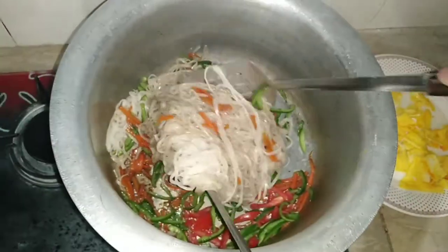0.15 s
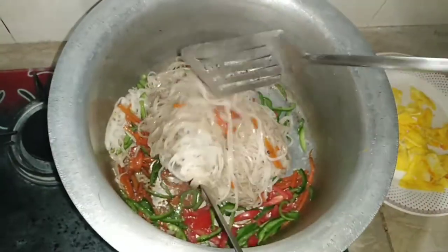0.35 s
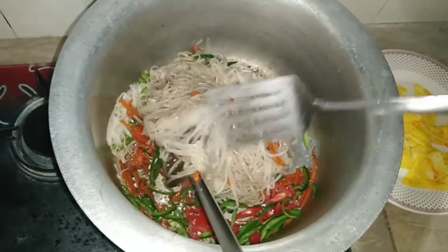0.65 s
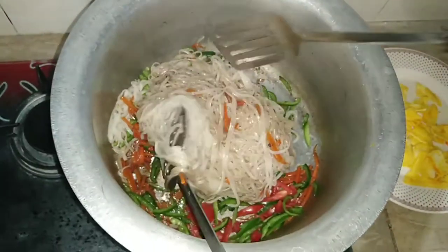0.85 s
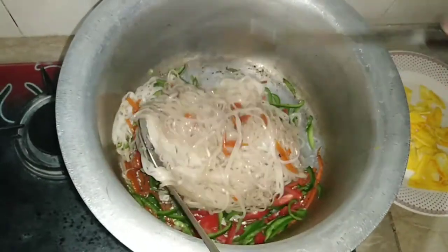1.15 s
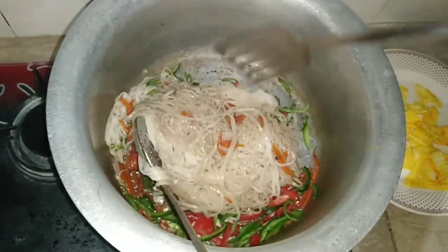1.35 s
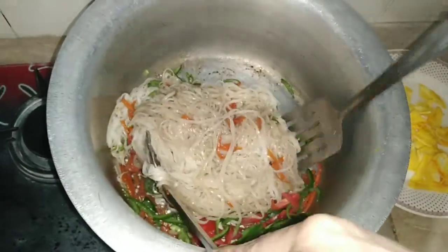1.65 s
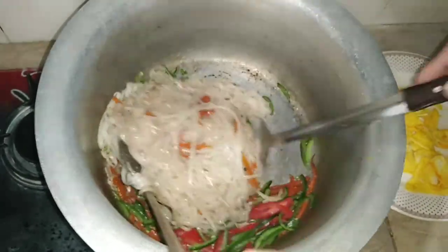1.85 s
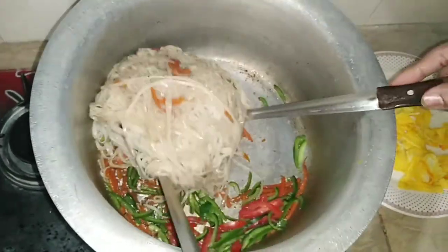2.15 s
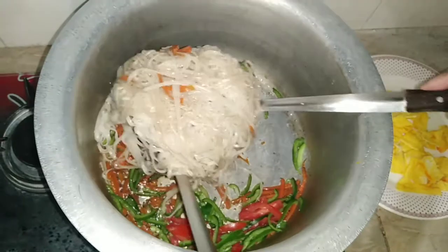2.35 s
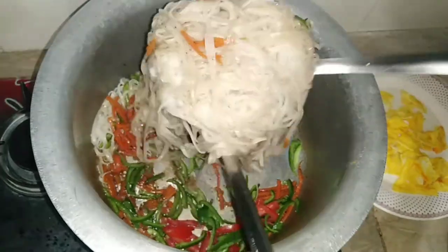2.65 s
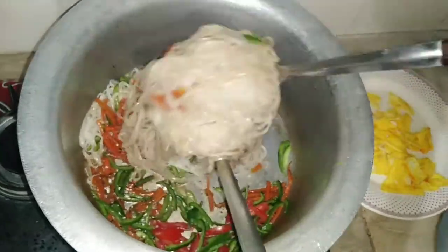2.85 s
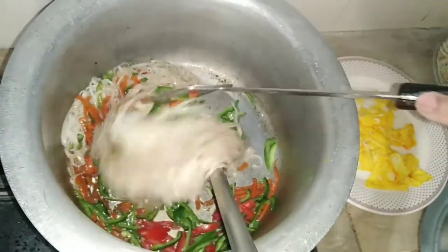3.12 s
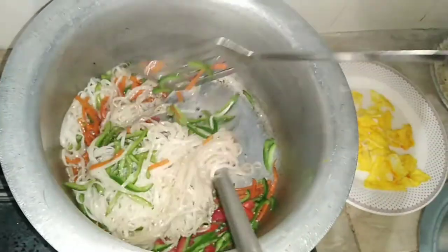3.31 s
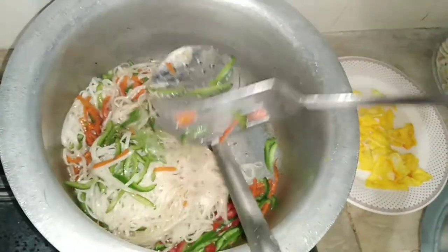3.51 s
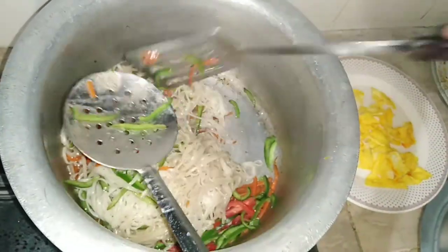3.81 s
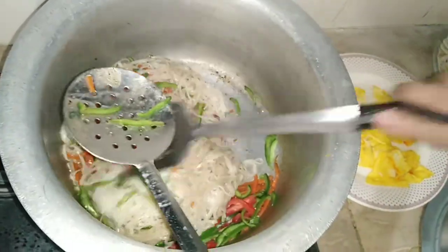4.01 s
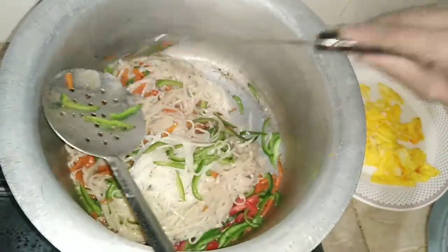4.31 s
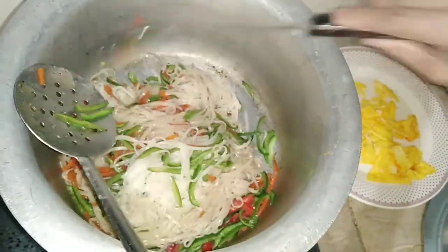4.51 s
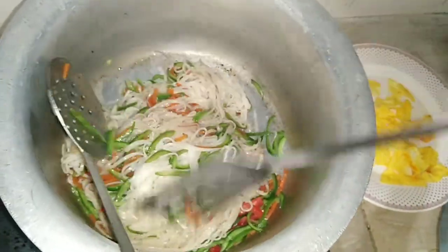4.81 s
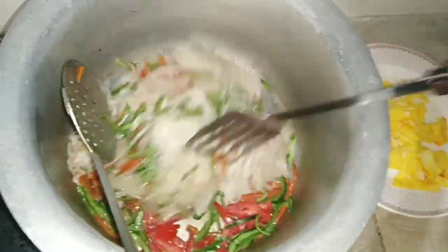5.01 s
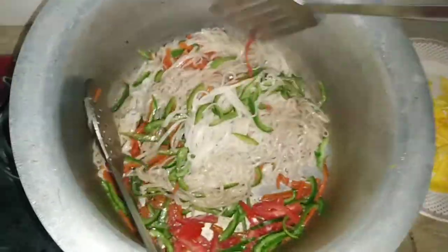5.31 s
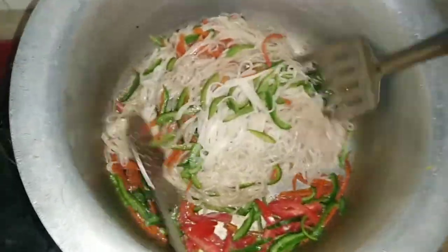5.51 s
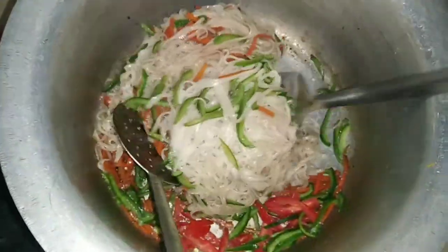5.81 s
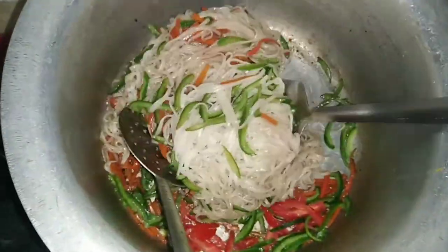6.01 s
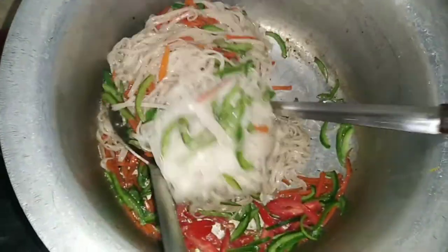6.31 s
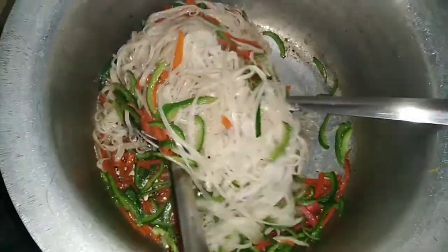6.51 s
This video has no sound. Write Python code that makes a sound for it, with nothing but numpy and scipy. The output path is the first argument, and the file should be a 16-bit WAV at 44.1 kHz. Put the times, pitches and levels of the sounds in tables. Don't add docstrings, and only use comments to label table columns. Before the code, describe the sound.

In a small kitchen, heard close above a wide metal pot, oil hisses steadily over a soft gas rumble. Light steel clinks come first, then knocks and scuffs as noodles are turned. After a lull, sharp bare utensil clinks ring out, followed by wall knocks, drags and a hard ringing strike; dull bumps and small scrapes finish.

```python
import sys
import numpy as np
from scipy import signal
from scipy.fft import rfft, irfft
from scipy.io import wavfile
from scipy.ndimage import uniform_filter1d

SR = 44100
rng = np.random.default_rng(int(sys.argv[2]) if len(sys.argv) > 2 else 0)


def to_wav(s):
    ch = np.atleast_2d(s).T
    pcm = np.round(np.clip(ch, -1, 1) * 32767)
    wavfile.write(sys.argv[1], SR, pcm.astype(np.int16))


def decibels_to_gain(level_db):
    exponent = np.asarray(level_db, float) / 20
    return 10 ** exponent


N = 293706

# (time [s], peak [dB], loudest ring [Hz], fall [s])
CLINKS = [
    (0.478, -15, 6830, 0.0072),
    (0.599, -16.5, 7000, 0.022),
    (3.5228, -3, 9430, 0.0034),
    (3.5846, -6, 8860, 0.012),
    (3.648, -12.5, 7300, 0.0027),
    (3.7145, -15, 9740, 0.003),
    (3.8698, -7.5, 6400, 0.008),
    (4.513, -9, 6800, 0.013),
    (4.6081, -6, 5520, 0.0057),
    (4.705, -5, 6820, 0.007),
]
# (time [s], peak [dB], body minus treble [dB], loudest ring [Hz], fall [s])
KNOCKS = [(0.728, -27.5, -15, 6100, 0.0091), (0.9189, -33, -3.5, 6200, 0.011),
          (1.2445, -19.5, -7, 6860, 0.0069), (1.259, -23, -4, 6600, .004), (1.5008, -17.5, -9, 6680, 0.023),
          (1.6025, -19, -5, 8200, 0.0046), (1.9677, -14, -8.5, 7300, 0.012),
          (4.2885, -9, -12, 7000, 0.0081), (5.4298, -7, -16.5, 7620, 0.012), (5.632, -19, -10, 6500, 0.018),
          (6.165, -18, -10, 7000, 0.0066)]
# (time [s], peak [dB], loudest ring [Hz], rise [s], fall [s])
SKIDS = [(0.568, -21.5, 7080, 0.013, 0.039), (0.622, -14, 9600, 0.0088, 0.011),
         (1.453, -36, 5860, 0.0088, .013), (1.663, -21, 5700, 0.014, 0.01), (2.059, -28, 8200, .0078, .011),
         (3.593, -10.5, 6560, 0.0053, 0.0055), (3.64, -13, 6860, .0078, 0.0061),
         (3.706, -6.5, 8100, 0.024, 0.0028), (4.5303, -18, 8650, .01, 0.013),
         (4.57, -21, 9600, .006, 0.0047), (4.616, -5.5, 5560, 0.0044, 0.0017),
         (5.331, -5, 7720, 0.018, 0.0085), (5.406, -17, 8300, 0.014, 0.0065)]
# (time [s], peak [dB], body minus treble [dB], rise [s], fall [s])
SCUFFS = [(0.995, -30.5, -2, 0.014, 0.018), (1.0202, -30, 0, .0049, 0.0041),
          (1.2194, -22.5, 2, 0.022, 0.0052), (1.5531, -21.5, -2.5, 0.017, 0.016),
          (1.8011, -16, -19, 0.015, 0.018), (1.8348, -25.5, -4, 0.0085, 0.021),
          (1.9184, -26, 1, 0.038, 0.0024), (2.108, -16, -18, 0.048, 0.0049),
          (2.194, -25, -12, 0.025, 0.0054), (2.3745, -26, -16.5, 0.037, 0.01),
          (2.83, -34, -21, .012, 0.032), (4.234, -24, -27, 0.003, 0.014),
          (4.4272, -12, -16.5, 0.034, 0.0041), (5.566, -26, -6.5, 0.0083, 0.005),
          (5.6593, -27, -4, 0.031, 0.0024), (5.7896, -26, -6.5, 0.011, 0.041),
          (6.077, -17.5, -12, 0.042, 0.0071), (6.105, -22.5, -5, .02, 0.072),
          (6.1837, -34, -10, .01, 0.0047)]
# (start [s], hold [s], level [dB], body minus treble [dB])
DRAGS = [
    (0.986, 0.022, -34, -7.5),
    (1.095, 0.016, -35.5, -12),
    (2.064, 0.031, -35.5, -10),
    (4.506, 0.14, -30.5, -11.5),
    (4.959, 0.078, -30, -11.5),
    (5.362, 0.12, -25, -9.5),
]
# (frequency [Hz], level [dB per Hz])
STEEL = [(1760, -53.5), (3000, -24.5), (3840, -18.5), (5450, -10.5), (5920, -4.5), (6520, -2.5),
         (9250, -3.5), (11500, -8.5), (12800, -19.5), (14500, -27), (15500, -99.5)]
# (frequency [Hz], level [dB per Hz])
BODY = [(180, 0.5), (300, 1.5), (606, 3), (986, -5), (1370, 7.5), (2130, 10.5), (3030, 4.5), (3670, 3),
        (4500, 11), (5850, -63.5), (9900, -120)]
# (frequency [Hz], level [dB], t60 [s])
TOOL_MODES = [(4620, -9, .04), (5360, -8, .05), (5578, -9, .07), (5845, -7, .06), (6430, -3, .04),
              (6680, -5, .045), (7250, -4, .035), (7865, -3, .045), (8260, -3, .04), (8590, -2, .055),
              (9240, -2, .045), (9580, -1, .055), (10070, -8, .035), (12380, -20, .03)]
# (frequency [Hz], left minus right [dB])
PORTS = [(300, 4.5), (2400, 9.5), (4400, 2.5), (6800, 3), (9000, 14), (11000, 9.5), (14000, 8.5)]
# (time [s], peak [dB], bass minus treble [dB])
CRACKS = [(0.4766, -22, -8), (1.2135, -29, 2), (1.218, -19, 5), (1.245, -22, 0), (1.501, -15, 0),
          (1.6025, -19, -12), (1.969, -20, 2), (3.522, -1, -10), (3.5845, -18, -16), (3.648, -6, -10),
          (3.871, -13, -20), (4.2885, -15, -4), (4.7037, -5, -18), (5.4284, -5, -18), (5.633, -23, -6),
          (6.165, -14, -2)]
# (time [s], peak [dB], frequency [Hz], t60 [s])
PINGS = [(.478, -26, 9140, .06), (.6, -25, 9500, 0.091), (.62, -13.5, 7700, 0.073), (.624, -18, 6600, .06),
         (.625, -33, 5220, 0.055), (1.213, -27, 4700, 0.055), (1.244, -22.5, 8000, 0.039),
         (1.258, -25, 6650, 0.042), (1.546, -19, 6630, 0.066), (1.659, -16.5, 5880, 0.1),
         (1.655, -18, 5500, 0.088), (1.656, -30, 8400, .06), (1.91, -27, 4600, 0.081),
         (2.06, -25, 9340, 0.055), (2.07, -24, 8200, 0.2), (2.104, -18, 6890, .04),
         (3.523, -25, 6480, 0.045), (3.588, -20, 6900, .06), (3.649, -26, 5560, .15),
         (3.646, -26, 10100, 0.037), (3.648, -26, 8150, 0.041), (3.698, -15, 9580, .12),
         (3.703, -25, 5575, .15), (3.87, -13, 8100, 0.052), (3.87, -27, 12400, .05),
         (4.232, -22.5, 8270, .06), (4.236, -25, 5930, .04), (4.236, -25, 4942, 0.11),
         (4.236, -28, 7540, .07), (4.502, -25.5, 4720, 0.2), (4.512, -11.5, 7460, 0.088),
         (4.512, -16.5, 8520, 0.14), (4.515, -17.5, 5600, 0.11), (4.512, -33, 11500, .05),
         (4.61, -8.5, 8780, 0.028), (4.608, -11, 7900, .06), (4.614, -11, 5800, 0.076),
         (4.62, -20, 4603, 0.079), (4.703, -15, 10000, 0.037), (5.326, -19, 4640, .08),
         (5.328, -21, 8580, .09), (5.4, -16, 7300, 0.083), (5.4, -21, 8590, .12), (5.4, -20, 4660, .06),
         (5.43, -26, 9420, .08), (5.434, -30, 4600, 0.11), (5.465, -18, 7630, 0.14),
         (6.064, -25, 6780, 0.04), (6.073, -25, 8240, 0.035), (6.165, -26, 8530, .04),
         (.478, -27.5, 2050, 0.011), (.992, -28, 2820, 0.16), (1.212, -26, 3080, 0.094),
         (1.246, -30, 3090, 0.076), (1.245, -22.5, 1760, .03), (1.245, -41, 1250, .04),
         (1.5, -31, 2520, 0.043), (1.603, -26, 1210, 0.015), (1.603, -28, 3990, 0.02),
         (1.603, -35, 2830, .03), (1.905, -23.5, 1290, 0.065), (1.91, -27, 3230, 0.068),
         (1.91, -28, 2600, 0.054), (2.106, -27.5, 1190, 0.024), (2.191, -31, 3250, 0.1),
         (3.588, -38, 2500, 0.06), (3.87, -30, 2320, 0.068), (4.236, -35, 3970, 0.054),
         (4.289, -22, 927, 0.042), (4.3, -18.5, 4560, 0.023), (4.425, -21, 3275, .06),
         (4.503, -26, 4150, .05), (4.504, -26, 3297, 0.31), (5.33, -21, 3950, 0.11),
         (5.432, -24.5, 3930, 0.11), (5.432, -23, 3000, 0.046), (5.565, -24, 5780, .04),
         (5.634, -25, 5570, .05), (5.632, -31, 1400, .05), (6.068, -25, 1992, 0.089),
         (6.07, -33, 3940, 0.068), (6.1138, -15, 424, 0.1), (6.164, -23, 1150, 0.016),
         (.92, -33.5, 806, .03), (2.833, -38, 800, .03), (3.523, -29, 1520, 0.018), (3.59, -30, 3320, .05),
         (3.65, -32, 4300, .05), (3.705, -31, 2490, .04), (4.612, -27, 3490, .06), (4.706, -22, 4280, .05),
         (6.115, -27, 744, 0.028)]
# (time [s], strength [dB], hardness [dB per octave], place round the wall [degrees])
RINGS = [(0.483, -44.5, -11, 67), (0.589, -45, -3, 68), (0.65, -55, -1, 88), (0.733, -45.5, 2.5, 44),
         (0.988, -42, 1.5, 30), (1.064, -47.5, -16.5, 68), (1.221, -43.5, -7, 85), (1.506, -37, -3, 35),
         (1.543, -30.5, 8.5, 67), (1.57, -28.5, 1, 68), (1.659, -36, 7.5, 87.5), (1.826, -38, 9, 88.5),
         (1.909, -40, 4, 80), (1.984, -41.5, 4, 46), (2.194, -52.5, -2, 77), (4.237, -40, 14, 84),
         (4.284, -40.5, -0.5, 44), (4.336, -45.5, -13, 70), (4.423, -34.5, 5.5, 74), (4.512, -32, 8.5, 89),
         (4.559, -42.5, 24, 88), (4.624, -33.5, 6, 60), (5.331, -25, 3, 62), (5.365, -27, 2, 62),
         (5.397, -26.5, 2, 64), (5.438, -23, 2.5, 11.8), (5.492, -30.5, 13.5, 90), (5.564, -40, -4, 66.5),
         (6.07, -46, -1, 86)]
# (frequency [Hz], t60 [s], left minus right [dB])
WALL_MODES = [(552, .35, -1.5), (1386, .2, -4.5), (2024, .17, 2.5), (2418, .16, 2.5), (2815, .18, 1.5),
              (3282, .1, 1.5), (3024, .08, 1.5)]
WALL_LOBES = [4, 3, 6, 1, 5, 5, 5]
WALL_LEVELS = [4.5, 2, -1.5, 0, -1.5, -11, -13]
HUSHES = np.array([.51, .635, .86, 1.12, 1.36, 1.535, 1.566, 1.6, 1.69, 1.75, 2.05, 2.25, 4.272, 4.456, 4.69, 5.36, 5.392, 5.432, 5.477, 5.539, 5.59, 6.097])
# (time [s], peak [dB], frequency [Hz], t60 [s])
BUMPS = [(0.919, -24.5, 448, 0.057), (1.216, -18.5, 554, 0.06), (1.244, -20.5, 540, 0.015),
         (1.5, -26.5, 533, 0.01), (1.533, -17, 484, 0.0071), (1.554, -22.5, 335, 0.049),
         (1.921, -18.5, 655, 0.045), (1.97, -27, 740, 0.029), (2.832, -28, 452, 0.044),
         (3.52, -36, 563, 0.029), (4.289, -13.5, 487, 0.029), (4.61, -25, 493, 0.016),
         (5.43, -45, 610, 0.15), (5.561, -29, 421, 0.092), (5.7, -42, 258, .08), (5.782, -39.5, 397, 0.14),
         (5.8, -39, 231, 0.17), (5.87, -44, 297, 0.042), (5.944, -33, 693, 0.027), (6.069, -31, 401, 0.24),
         (6.13, -26, 402, 0.05), (6.215, -41, 415, 0.07)]
# (time [s], peak [dB], frequency [Hz])
THUDS = [(0.925, -39, 145), (1.209, -41, 164), (1.249, -42, 137), (1.559, -32.5, 174), (1.878, -46, 83.4),
         (3.53, -51, 88), (4.282, -45, 147), (4.588, -42, 85.6), (5.619, -29, 106), (6.067, -36, 85),
         (6.125, -28.5, 97), (6.289, -40, 149)]
# (time [s], left minus right [dB])
HAND = [
    (0, 0),
    (1, -1.5),
    (2.2, 1.5),
    (4.3, 0.3),
    (4.7, 0),
    (5.3, -1),
    (5.7, -3),
    (6.66, 0.5),
]
# (frequency [Hz], level [dB per Hz])
SIZZLE = [(2530, -82.5), (4300, -0.5), (5100, -1), (5620, 2), (6430, 8.5), (8810, 5), (10400, -2),
          (14200, -15.5), (14700, -44), (15000, -75), (15500, -106)]
# (frequency [Hz], level [dB per Hz])
STEAM = [(410, -10), (700, -5), (748, -7), (903, -8.5), (1300, -1.5), (2330, 0.5), (2700, 1), (5000, -9),
         (6500, 11.5), (11000, -120)]
# (time [s], stirring [dB])
STIR = [(0, 2), (.6, 5.5), (1.3, 3.5), (1.6, 13.5), (2.0, 7.5), (2.2, 1), (2.7, 0), (3.1, 3.5), (3.4, 4.5),
        (4.0, 6), (4.45, 8), (4.9, 5.5), (5.2, 4.5), (5.5, 3.5), (5.6, 10.5), (5.9, 3.5), (6.66, 3)]
# (frequency [Hz], level [dB per Hz])
FLAME = [(15, -99), (25, -22.5), (112, -1), (242, -6.5), (273, -7.5), (329, -8), (499, -8), (548, -10.5),
         (680, -11.5), (746, -18.5), (1000, -14.5), (1300, -86), (2200, -120)]

SIZZLE_DB, STEAM_DB, FLAME_DB = -34, -45, -49
SIZZLE_PER_STIR, FLAME_PER_STIR = .34, .2
CLINK_BODY_DB, SKID_BODY_DB = -32, -32
BLOW_RISE_S, CRACK_FALL_S, THUD_T60_S = .001, .0029, .22
SCUFF_RING_HZ = 8200
DRAG_ATTACK_DB_PER_S, DRAG_RELEASE_DB_PER_S = 235, 188
NODE_LEAK = .025
WALL_FLUTTER_DB = 1.6
RING_LEAD_S = .007
ROOM_T60_S, ROOM_DB = .14, -11.5


def curve(table):
    rows = np.array(table)
    return np.interp(np.arange(N) / SR, rows[:, 0], rows[:, 1])


def unit(x):
    return x / np.sqrt(np.mean(x ** 2))


def colour(x, table, *, size=1024):
    hz, db = np.transpose(table)
    f = np.arange(size // 2 + 1) * SR / size + 1
    cepstrum = irfft(np.interp(np.log(f), np.log(hz), db) * np.log(10) / 20)
    cepstrum[1:size // 2] *= 2
    cepstrum[size // 2 + 1:] = 0
    taps = unit(irfft(np.exp(rfft(cepstrum)))) / np.sqrt(size)
    taps = np.reshape(taps, (1,) * (x.ndim - 1) + (-1,))
    return signal.oaconvolve(x, taps, axes=-1)[..., :x.shape[-1]]


def mode(x, hz, t60):
    radius = np.exp(-np.log(1000) / (max(t60, .005) * SR))
    angle = 2 * np.pi * hz / SR
    return signal.lfilter([np.sin(angle)], [1, -2 * radius * np.cos(angle), radius * radius], x)


def walk(rate):
    hold = int(SR / rate)
    levels = np.repeat(rng.standard_normal(N // hold + 1), hold)
    return 1.3 * uniform_filter1d(uniform_filter1d(levels, hold), hold)[:N]


def grains(shape, share, spread_db):
    struck = rng.random(shape) < share
    return struck * rng.standard_normal(shape) * decibels_to_gain(spread_db * rng.exponential(size=shape))


def add(out, s, x):
    i = max(int(s * SR), 0)
    out[:, i:i + x.shape[1]] += x[:, :N - i]


def metal(force, body_db, ring_hz, ring_db):
    ticks = grains(len(force), .25, spread_db=1.2)
    heard = np.array([np.roll(ticks, rng.integers(-4, 16)), ticks])
    chatter = force * (heard + .25 * rng.standard_normal(heard.shape))
    chances = rng.standard_normal((len(TOOL_MODES), 2, 1))
    tool = 0
    for (hz, db, t60), chance in zip(TOOL_MODES, chances):
        tool = tool + decibels_to_gain(db + 2.5 * chance) * mode(chatter, hz, t60)
    clear_ring = unit(mode(chatter, ring_hz, .026))
    bright = unit(colour(chatter, STEEL)) + .8 * unit(tool) + decibels_to_gain(ring_db) * clear_ring
    bright = signal.sosfilt(signal.butter(2, [2200, 12500], "band", fs=SR, output="sos"), bright)
    spots = sum(mode(chatter, hz, .034) * np.sqrt(1000 / hz) for hz in 700 * 6.38 ** rng.random(7))
    body = colour(unit(chatter) + .58 * unit(spots), BODY)
    return unit(bright) * decibels_to_gain(np.array([[.7], [-.7]])) + decibels_to_gain(body_db) * unit(body)


def port(heard, shading, gain_db):
    return colour(heard, np.array(PORTS) * [1, shading]) * decibels_to_gain(gain_db)


def contacts():
    out, lead = np.zeros((2, N)), .04
    t = np.arange(int(.22 * SR)) / SR - lead
    rows = [(s, db, CLINK_BODY_DB, hz, BLOW_RISE_S, fall) for s, db, hz, fall in CLINKS]
    rows += [(s, db, body_db, hz, BLOW_RISE_S, fall) for s, db, body_db, hz, fall in KNOCKS]
    rows += [(s, db, SKID_BODY_DB, hz, rise, fall) for s, db, hz, rise, fall in SKIDS]
    rows += [(s, db, body_db, SCUFF_RING_HZ, rise, fall) for s, db, body_db, rise, fall in SCUFFS]
    for s, db, body_db, hz, rise, fall in rows:
        late = t - .2 * rise
        force = 1 / (np.exp(-late / max(.3 * rise, 2e-4)) + np.exp(late / max(fall, .002)))
        add(out, s - lead, metal(force, body_db + 2, hz, ring_db=-2.5) * decibels_to_gain(db - 18))
    lead = .1
    t = np.arange(int(.45 * SR)) / SR - lead
    for s, hold, db, body_db in DRAGS:
        attack_db = DRAG_ATTACK_DB_PER_S * np.minimum(t, 0)
        release_db = DRAG_RELEASE_DB_PER_S * np.maximum(t - hold, 0)
        force = decibels_to_gain(db + attack_db - release_db + 2 * walk(60)[:len(t)])
        add(out, s - lead, metal(force, body_db, 7865, ring_db=-10) * np.sqrt(np.mean(force ** 2)))
    return np.array([port(out[0], .29, 3), port(out[1], -.85, 1.04)])


def cracks():
    out, t = np.zeros((2, N)), np.arange(int(.03 * SR)) / SR
    for s, db, bass_db in CRACKS:
        burst = grains(len(t), .4, spread_db=2.5) * np.exp(-t / CRACK_FALL_S)
        tint = [(300, bass_db - 14), (900, bass_db), (3000, bass_db), (6000, 10), (12000, 4), (16000, -35)]
        burst = colour(burst, tint, size=256)
        add(out, s, np.array([np.roll(burst, 6), burst]) / np.abs(burst).max() * decibels_to_gain(db))
    return out


def pings():
    out, t = np.zeros((2, N)), np.arange(int(.25 * SR)) / SR
    for s, db, hz, t60 in PINGS:
        rattle = grains(len(t), .2, spread_db=1.2) * np.exp(-t / (.003 + .07 * t60))
        ring = mode(mode(rattle, hz, .008), hz, .7 * t60)
        lag = round(SR / hz * (hz // 3000 + .22 * min(hz / 1500, 1)))
        add(out, s, np.array([1.2 * np.roll(ring, lag), ring]) / np.abs(ring).max() * decibels_to_gain(db))
    return out


def wall():
    out, t = np.zeros((2, N)), np.arange(int(.4 * SR)) / SR
    flutter = decibels_to_gain(WALL_FLUTTER_DB * np.array([walk(70) for _ in WALL_MODES]))
    rests = np.array(HUSHES)
    for s, db, hard_db, place in RINGS:
        push = grains(len(t), .1, spread_db=1.5) * np.exp(-t / .01) * np.minimum(t / .003, 1)
        turns = .2 + .12 * rng.random(len(WALL_MODES))
        next_rest = rests[rests > s + .02][0]
        hush = decibels_to_gain(-900 * np.maximum(t + s - next_rest, 0))
        modes = zip(WALL_MODES, WALL_LOBES, WALL_LEVELS, turns, flutter)
        for (hz, t60, pan_db), lobes, own_db, turn, touch in modes:
            swing = abs(np.cos(np.radians(lobes * place))) + NODE_LEAK
            size = decibels_to_gain(db + own_db + hard_db * np.log2(hz / 1400)) * swing
            ring = mode(mode(push, hz, .02), hz, t60) * hush
            lag = int(turn * min(hz / 1300, 1) ** 2 * SR / hz)
            pair = np.array([ring * decibels_to_gain(pan_db / 2), np.roll(ring, lag) * decibels_to_gain(-pan_db / 2)])
            pair = pair / np.abs(ring).max()
            add(out, s - RING_LEAD_S, pair * size * decibels_to_gain(3.5) * np.resize(touch[int(s * SR):], len(t)))
    return out


def bumps():
    out, t = np.zeros((2, N)), np.arange(int(.3 * SR)) / SR
    for s, db, hz, t60 in BUMPS + [(*row, THUD_T60_S) for row in THUDS]:
        wobble = np.sin(2 * np.pi * hz * t) + 3 * rng.standard_normal(len(t))
        push = t * np.exp(-t * hz / .5) * wobble
        ring = unit(mode(push, hz, t60))
        ring = ring + .5 * unit(mode(push, 1.55 * hz, t60))
        ring = ring + .23 * unit(mode(push, 2.02 * hz, .16 * t60))
        pair = np.array([ring, 1.12 * np.roll(ring, 7)])
        add(out, s, pair / np.abs(ring).max() * decibels_to_gain(db + .8))
    return out


def sizzle():
    bubbles = np.zeros((2, N))
    for lag in range(-14, 15, 4):
        patch = grains(N, .03, spread_db=1.5) * decibels_to_gain(3 * walk(25))
        bubbles += patch, np.roll(patch, lag)
    bubbles = unit(bubbles) + .8 * rng.standard_normal((2, N))
    stirring = curve(STIR)
    crackle_db = SIZZLE_DB + SIZZLE_PER_STIR * stirring + .8 * walk(6)
    crackle = unit(colour(bubbles, SIZZLE)) * decibels_to_gain(crackle_db)
    steam = unit(colour(bubbles * decibels_to_gain(1.3 * walk(9)), STEAM)) * decibels_to_gain(STEAM_DB + stirring)
    return decibels_to_gain(np.array([[1.2], [-1.2]])) * (crackle + steam)


def flame():
    mid, side = rng.standard_normal((2, N)) * decibels_to_gain(2.2 * walk(13))
    side = .4 * colour(side, [(30, -1.5), (90, -12), (300, -5), (900, 0), (20000, 0)], size=4096)
    rumble = unit(colour(np.array([mid + side, mid - side]), FLAME, size=8192))
    return rumble * decibels_to_gain(FLAME_DB + FLAME_PER_STIR * curve(STIR))


def kitchen(hits):
    t = np.arange(int(.4 * SR)) / SR
    tail = rng.standard_normal((2, len(t))) * decibels_to_gain(-60 * t / ROOM_T60_S) * (t > .003)
    tail = colour(tail, [(100, 4), (3000, 4), (12000, -7)])
    tail = tail / np.sqrt(np.sum(tail ** 2) / 2)
    return decibels_to_gain(ROOM_DB) * signal.oaconvolve(hits, tail, axes=1)[:, :N]


def scene():
    hits = contacts() + cracks() + pings() + wall() + bumps()
    hits = hits * decibels_to_gain(curve(HAND) * np.array([[.5], [-.5]]))
    return hits + kitchen(hits) + sizzle() + flame()


def top_cut(x):
    return signal.sosfilt(signal.butter(12, 15620, fs=SR, output="sos"), x)


def record(dry):
    mix = np.tanh(dry / 1.031)
    mix = signal.sosfilt(signal.butter(3, 50, "high", fs=SR, output="sos"), mix)
    mix = signal.sosfilt(signal.butter(4, 16000, fs=SR, output="sos"), mix)
    return top_cut(mix)


dry = scene()
out = record(dry)
to_wav(out)
```